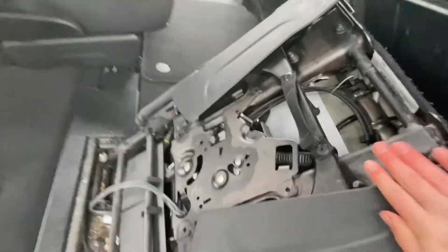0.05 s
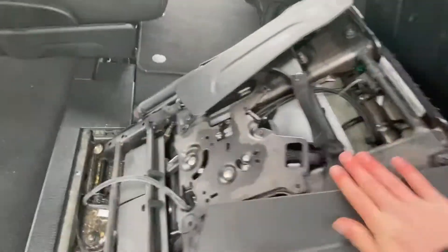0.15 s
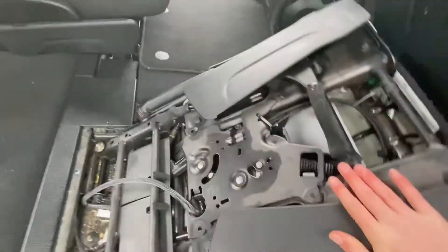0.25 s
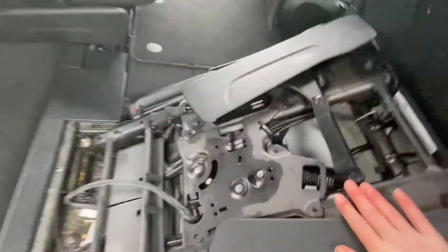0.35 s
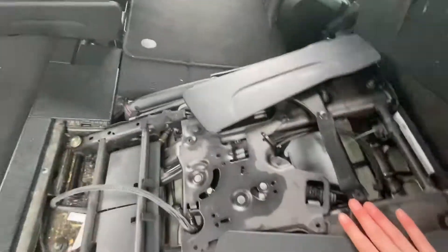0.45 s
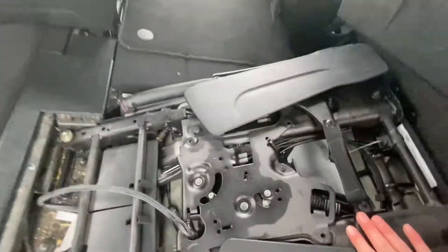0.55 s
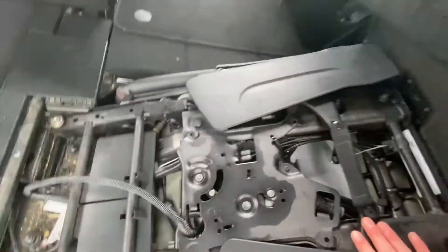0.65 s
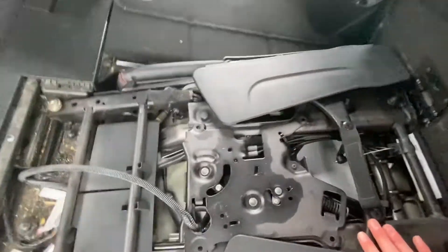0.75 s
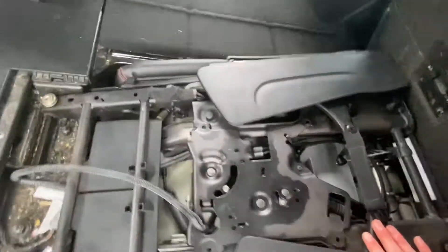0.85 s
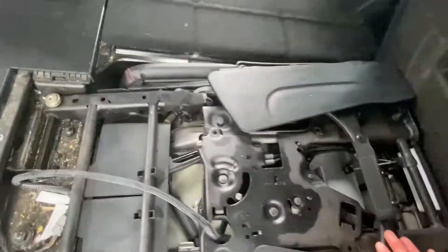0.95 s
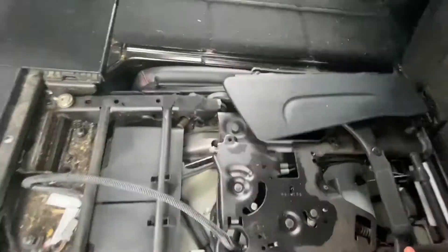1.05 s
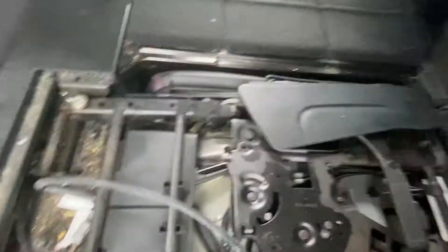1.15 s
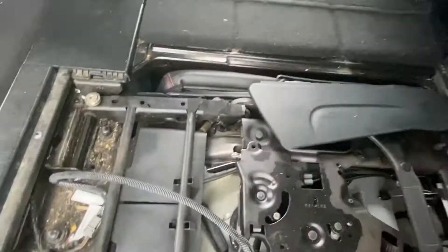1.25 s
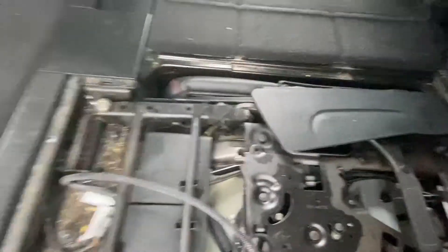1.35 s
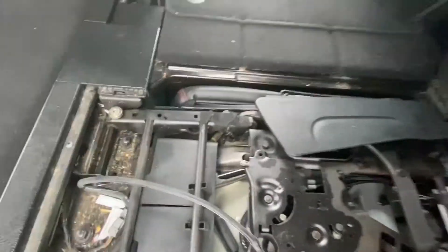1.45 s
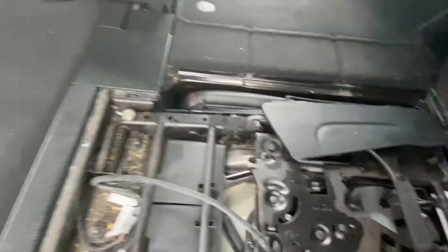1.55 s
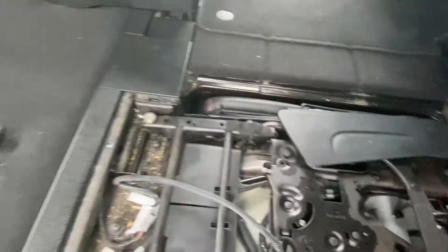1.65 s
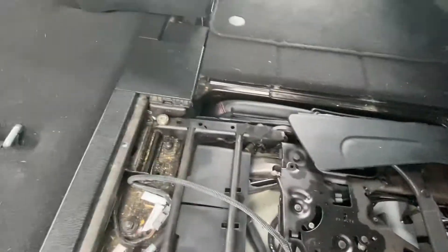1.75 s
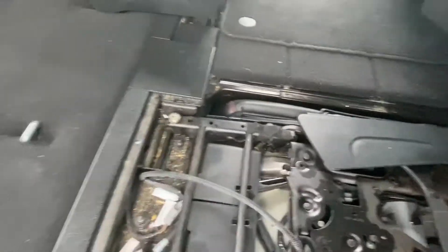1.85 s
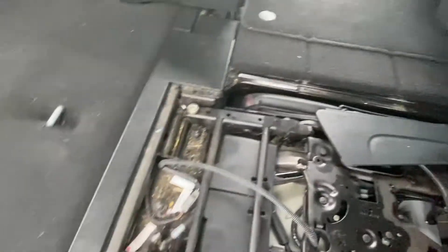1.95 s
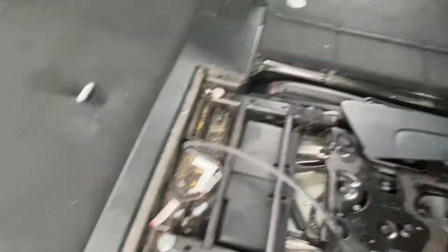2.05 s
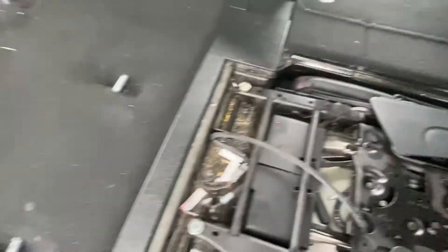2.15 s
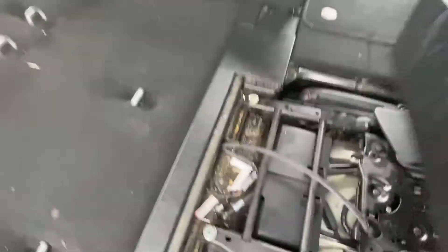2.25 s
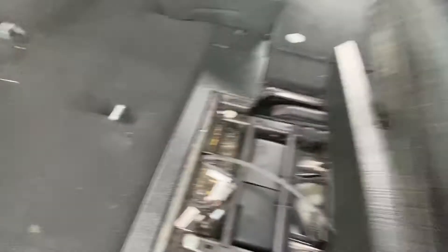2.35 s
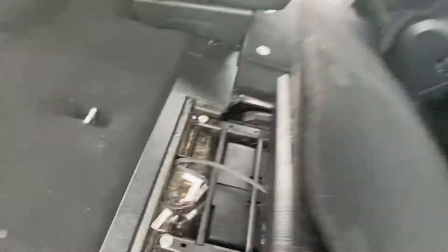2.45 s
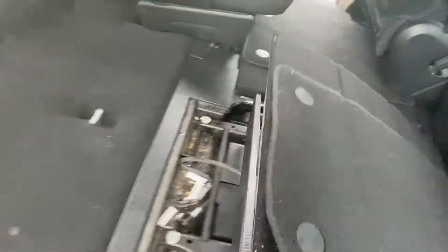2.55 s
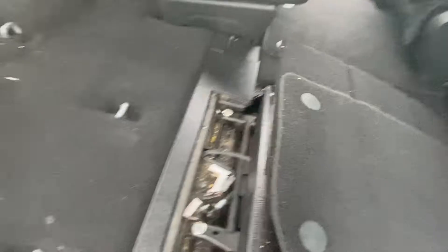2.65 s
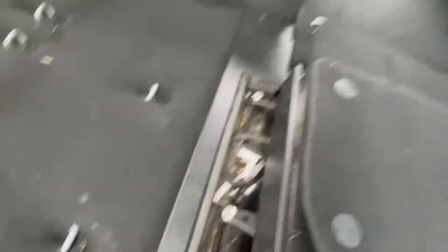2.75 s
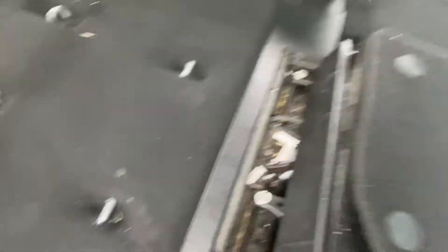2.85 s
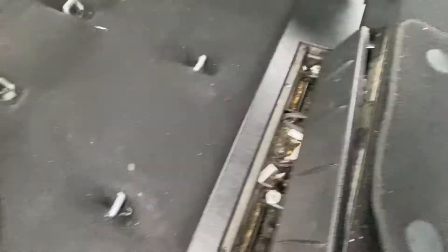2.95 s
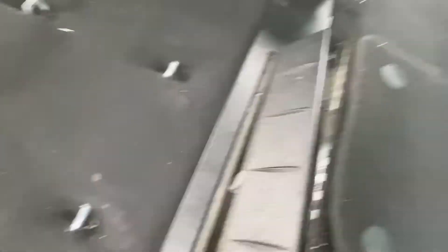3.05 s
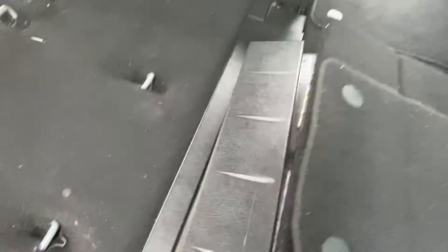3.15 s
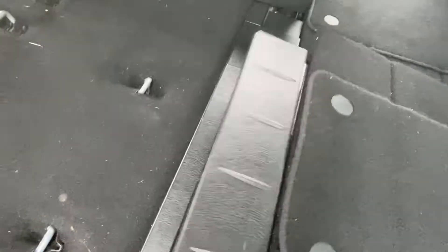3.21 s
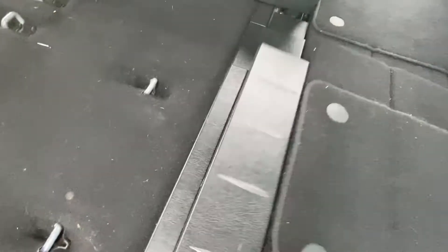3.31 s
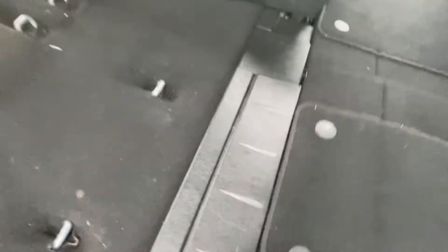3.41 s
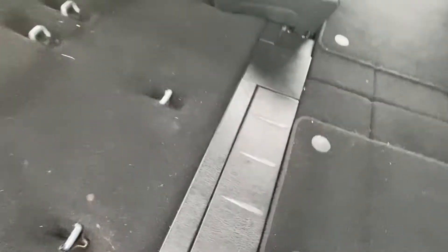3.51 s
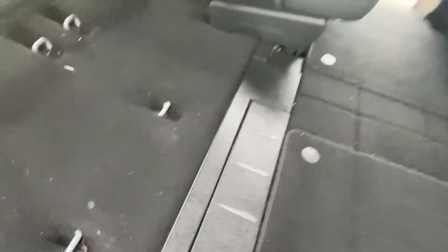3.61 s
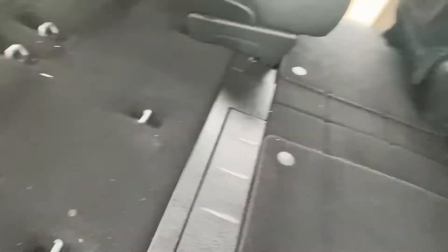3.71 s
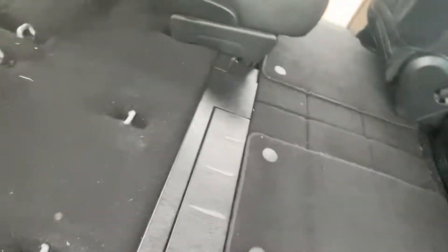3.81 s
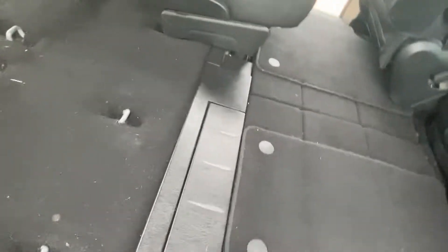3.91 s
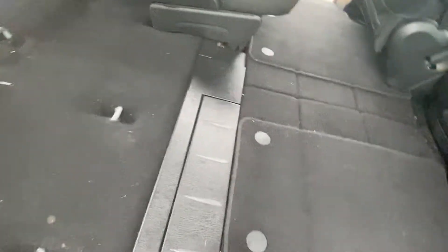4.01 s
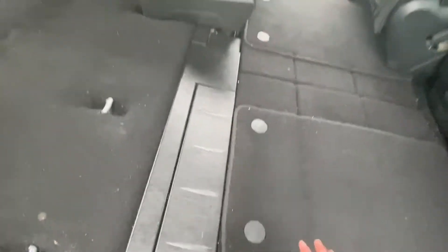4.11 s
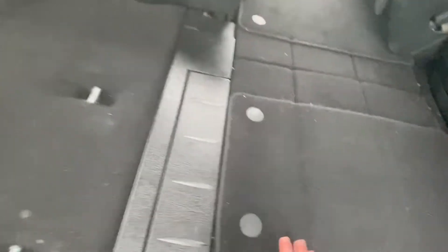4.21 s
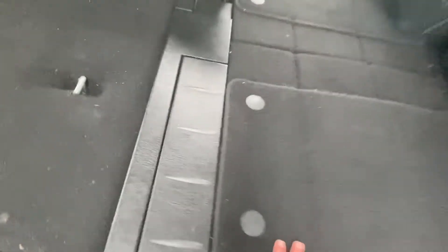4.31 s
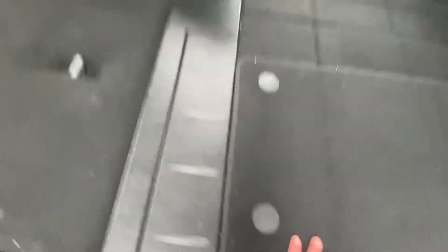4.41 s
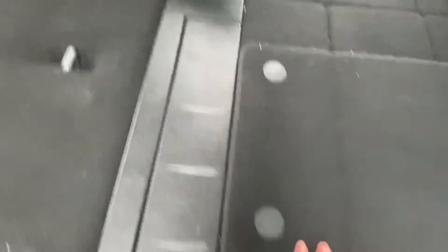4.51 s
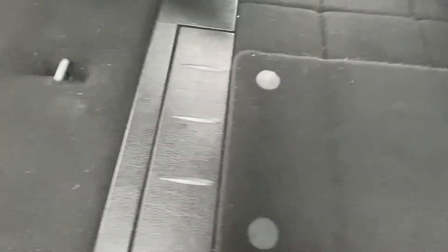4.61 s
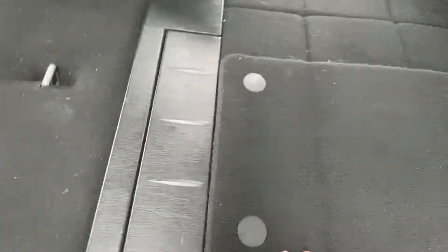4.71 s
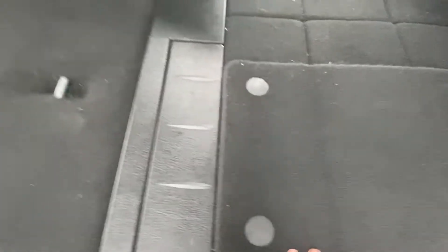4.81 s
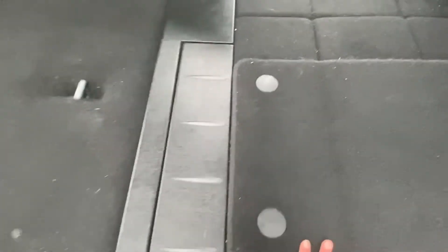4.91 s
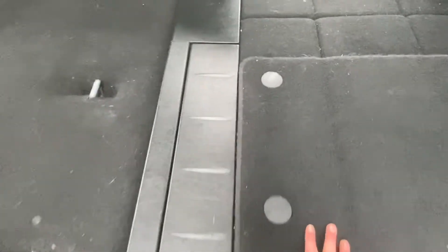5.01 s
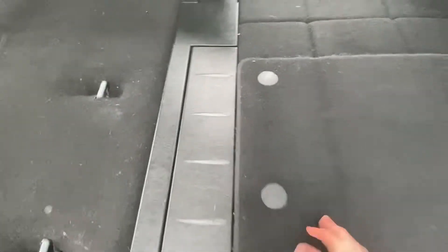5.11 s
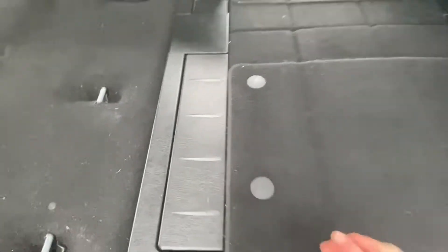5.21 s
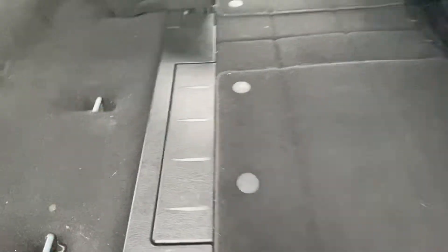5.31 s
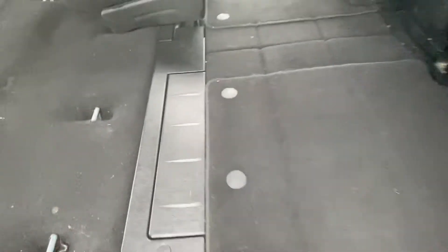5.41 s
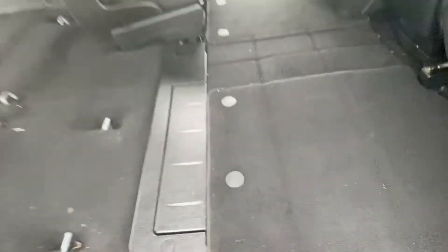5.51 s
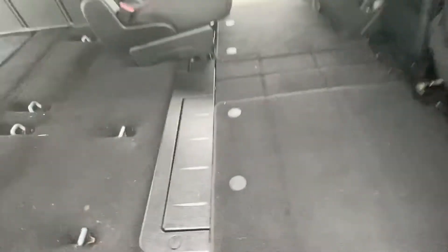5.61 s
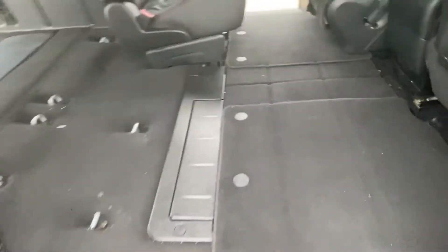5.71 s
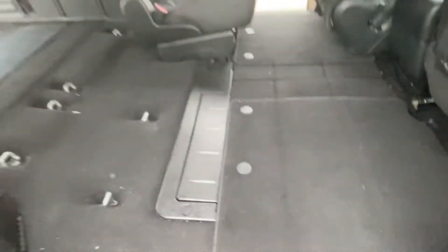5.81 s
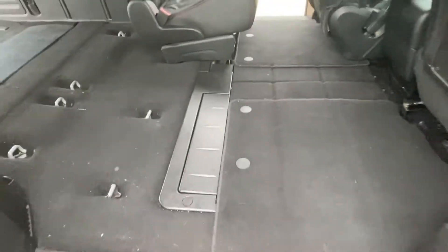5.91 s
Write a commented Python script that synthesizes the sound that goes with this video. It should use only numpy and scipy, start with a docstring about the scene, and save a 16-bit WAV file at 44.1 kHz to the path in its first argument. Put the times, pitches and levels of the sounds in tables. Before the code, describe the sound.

A seat is folded into a vehicle floor by hand. Gritty hinge scraping leads at once to a sharp metallic latch snap, then rubbing fabric and several hard frame knocks. A thumping carpeted panel follows, then quick plastic knocks ending in a loud snap. Soft brushing, small ticks and a muffled pat trail off. The microphone is near, in a small damped cabin with faint hiss and handling rumble.

```python
"""A dry hinge scrapes close by as a vehicle's folding seat goes down into the floor; a steel latch snaps.
The frame knocks as it settles and upholstery rubs; a carpeted panel slaps down, a plastic trim flap clunks
shut and a hand pats the carpet, among scuffs, ticks, faint whistles, rumble and hiss.
Impacts excite dense ringing, a few modes and the floor; friction is a train of tiny random slips
coloured by resonances; the background is filtered noise, and nearby surfaces comb the closer sounds."""
import sys
import numpy as np
from scipy import signal
from scipy.fft import rfft, irfft
from scipy.io import wavfile
from scipy.ndimage import uniform_filter1d

SR = 44100
rng = np.random.default_rng(int(sys.argv[2]) if len(sys.argv) > 2 else 0)


def file_out(sig):
    """Save sig as 16-bit WAV at sys.argv[1]."""
    # one column per channel
    cols = np.atleast_2d(sig).T
    # limit, then scale
    lim = np.clip(cols, -1, 1)
    pcm = np.round(lim * 32767).astype(np.int16)
    wavfile.write(sys.argv[1], SR, pcm)


N = 262836
TIME = np.arange(N) / SR

# Impacts of the steel latch: (time [s], level [dB], low thud [dB re level], 250-1200 Hz boost [dB],
# boost above 4500 Hz [dB], ring t60 [s], chatter [s], left-right [dB], favoured resonance [Hz])
LATCH_IMPACTS = [(.2815, -27, -25, 7.5, 8.5, 0.022, .001, -6.5, 4630),
                 (.3035, -11, -24, -2, 4.5, 0.072, 0.0049, -2.5, 2500),
                 (.3355, -21.5, -4, 7, -2.5, 0.053, 0.0024, -4, 2083),
                 (.352, -33.5, 1, 4.5, 0, .06, .002, -1, 1700),
                 (.3835, -28.5, -20, 13, 15, 0.032, 0.0023, -7, 4960)]
# Impacts of the settling frame: (the same nine columns and units)
FRAME_IMPACTS = [(.8785, -25, 0, 8, 11, 0.058, 0.016, -3.5, 398),
                 (.902, -29.5, -14, 1, -18, 0.023, 0.0039, 0, 515),
                 (1.0745, -16, -2, -7.5, 2, 0.0092, 0.0051, -3, 1030),
                 (1.151, -30.5, 9, 7, -6, 0.097, 0.0085, -4, 756),
                 (1.199, -34.5, 9, 13, -25, 0.16, .002, -16, 1010),
                 (1.2075, -20, -30, -1.5, -2, 0.028, 0.0025, 2.5, 730),
                 (1.218, -27, -1.5, -19, -21, 0.022, 0.0013, -4.5, 2300),
                 (1.3725, -19, -26, 6.5, 6, 0.065, 0.0024, 0, 415),
                 (1.403, -41, -5, 13, -10, 0.044, 0.0034, -14, 800)]
# Impacts of the carpeted panel: (the same nine columns and units)
PANEL_IMPACTS = [(2.5725, -16.5, 4, 0.018, -7, 0.086, 0.023, 0.38, 3440),
                 (2.6645, -29.5, -3.5, 0.01, -16, 0.076, 0.0053, 0, 424),
                 (2.7025, -32, -1, 0, -18, 0.033, 0.011, 0, 1110)]
# Knocks of the plastic flap: (the same nine columns and units)
FLAP_KNOCK_IMPACTS = [(3.0105, -25.5, -5, 0.5, 13.4, 0.05, 0.0022, -2, 650),
                      (3.152, -32.5, 0, 3.5, 0.33, 0.059, 0.0037, -0.5, 353),
                      (3.2255, -26, -2.5, -1, 0.17, 0.014, 0.0045, -2.5, 2630),
                      (3.2945, -15, -20.5, 2.5, 2.2, 0.04, 0.0091, -1.5, 508),
                      (3.332, -23.5, -11, -1.5, 4.2, 0.051, 0.013, -1.5, 1360)]
# Impacts of the flap as it snaps: (the same nine columns and units)
FLAP_SNAP_IMPACTS = [(3.378, -21.5, -15.5, 1.5, 4.5, .05, .006, -1.3, 6940),
                     (3.3825, -9, -16, -3.5, 2.5, 0.033, 0.0085, -1.6, 870),
                     (3.43, -32, -9, 6.5, 0, 0.055, 0.022, -1, 1510),
                     (3.4545, -19.5, -7.5, -4, 3, 0.042, .002, -1.6, 3230),
                     (3.479, -27, -12, 1.5, -3, 0.053, 0.0074, 0, 1250)]
# Pats of a hand on the carpet: (the same nine columns and units)
PAT_IMPACTS = [(4.162, -45.5, -14, 0.0077, 0.0036, .09, 0.0096, 0.24, 232),
               (4.9165, -32, -10, 0, 0, 0.04, 0.0064, -1, 860),
               (5.171, -56, -12, 0.0015, 0.0071, 0.11, .006, 0.18, 297)]
# Small ticks of the trim: (the same nine columns and units)
TICK_IMPACTS = [(.9325, -37.5, 11.5, 6, 6, 0.03, 0.002, -6, 6400),
                (1.533, -38.5, -2, 3.5, -7, 0.13, 0.0091, -2, 2440),
                (1.596, -43.5, -1, 1, 3, 0.046, .002, 0, 2960),
                (1.909, -39.5, -16, -7, -4, 0.022, 0.0031, -2.5, 2950),
                (2.024, -52, -2, 6, -2, 0.025, .001, -7, 2800),
                (2.065, -47, 5, -13, 0, 0.12, 0.0022, -12, 2340),
                (2.973, -52.5, -15, -11, 3, .03, 0.0017, -2, 3320),
                (3.0945, -46, -9.5, -17, -8, 0.082, .002, -0.5, 3130),
                (5.5, -52.5, -13, 8.5, -23, 0.041, 0.00086, 6, 1710),
                (5.848, -48, -10, 8.5, 0, 0.019, 0.0011, -4, 2500),
                (5.902, -49.5, -9, 4, -2.5, 0.024, 0.0013, 0, 2510)]

# Dense, short ringing of the latch: (frequency [Hz], relative level [dB per Hz])
LATCH_SPECTRUM = [(88, -44), (150, -11), (675, -3), (941, -8), (1390, -8), (2060, -3), (3100, -7.5),
                  (3420, -10), (4760, -14), (7770, -27), (14800, -35), (16000, -44.5)]
# Dense ringing of the frame: (frequency [Hz], relative level [dB per Hz])
FRAME_SPECTRUM = [(120, -19), (200, -19), (749, -2), (883, -19), (1080, -4), (1300, -10.5), (2700, -12.5),
                  (2960, -26.5), (4120, -21), (9400, -42.5), (11300, -41), (16000, -44)]
# Dense ringing of the panel: (frequency [Hz], relative level [dB per Hz])
PANEL_SPECTRUM = [(120, -36), (200, -3), (569, -15), (806, -26.5), (1100, -12), (1620, -20.5), (2050, -17),
                  (2960, -20.5), (3490, -20.5), (7830, -21.5), (13100, -29.5), (14600, -20), (16000, -37)]
# Dense ringing of the knocking flap: (frequency [Hz], relative level [dB per Hz])
KNOCK_SPECTRUM = [(110, -37), (180, -6.5), (496, -3.5), (722, -9), (1270, -9), (1390, -13), (1530, -9),
                  (2310, -14.5), (3630, -25), (9820, -43.5), (16000, -51.5)]
# Dense ringing of the snapping flap: (frequency [Hz], relative level [dB per Hz])
SNAP_SPECTRUM = [(110, -43.5), (180, -11), (487, -3), (622, -12), (824, -2.5), (1420, -14), (2690, -9),
                 (3500, -17), (4720, -15.5), (5090, -19.5), (11800, -29), (13300, -32.5), (16000, -31)]
# Dense response of the patted carpet: (frequency [Hz], relative level [dB per Hz])
PAT_SPECTRUM = [(110, -34), (180, 1), (662, -21), (938, -9.5), (1400, -29), (1640, -24), (2140, -41),
                (8000, -48), (10400, -80), (17600, -120)]
# Dense ringing of the ticking trim: (frequency [Hz], relative level [dB per Hz])
TICK_SPECTRUM = [(150, 2.5), (900, 1), (2700, -3), (4500, -7), (9000, -12), (16000, -24.5)]

# Clear modes of latch and trim: (nominal frequency [Hz], relative level [dB], t60 [s])
LATCH_RESONANCES = [(782, 0.5, .12), (953, -1.5, .1), (1324, -20, 0.21), (2060, -16.5, .3), (2040, -23, .1),
                    (2223, -18, .15), (2360, -13, 0.11), (2800, -11.5, .2), (3320, -20, 0.75),
                    (4850, -14, 0.13)]
# Clear modes of the frame: (nominal frequency [Hz], relative level [dB], t60 [s])
FRAME_RESONANCES = [(430.6, -5, 0.13), (761, 5.5, 0.082), (1014, 5.5, 0.052), (1606, -5.5, 0.089),
                    (1946, 0, 0.035), (2320, -9, 0.083), (3160, -14, 0.06)]
# Clear modes of the panel: (nominal frequency [Hz], relative level [dB], t60 [s])
PANEL_RESONANCES = [(616, -37, .12), (1033, -19, 0.22), (2096, 0, 0.063), (2690, -12, 0.17),
                    (3340, -4, 0.056)]
# Clear modes of the flap: (nominal frequency [Hz], relative level [dB], t60 [s])
FLAP_RESONANCES = [(330, -23.5, 0.21), (480, 2, 0.076), (754, -24, 0.057), (937, -12.5, 0.076),
                   (935, -21, 0.12), (1400, -17, 0.08), (2536, -15.5, 0.12)]
# Clear modes of the patted carpet: (nominal frequency [Hz], relative level [dB], t60 [s])
PAT_RESONANCES = [(211, -15, 0.34), (369, -2.5, 0.074), (840, -1, 0.093), (1008, -7, 0.061)]
# Low modes of the floor: (nominal frequency [Hz], relative level [dB], t60 [s])
FLOOR_RESONANCES = [(68, -5.5, 0.09), (102.4, 1, .15), (137.6, 3, 0.2), (186.3, -3, 0.16), (233, -5, 0.068),
                    (317, 3.5, 0.078), (410, -12.5, 0.13)]

# Scraping of the hinge: (time [s], relative song level [dB], relative grit level [dB])
HINGE_LEVELS = [(0.0, -35.5, -39.5), (0.106, -27.5, -34.5), (0.118, -33.5, -37.5), (0.21, -30.5, -33),
                (0.246, -33.5, -32), (0.27, -34, -34)]
# Frame resonances the hinge excites: (frequency [Hz], width [Hz], relative level [dB])
HINGE_RESONANCES = [(663.6, 70, 5.5), (767, 90, -2), (900, 140, -5.5)]
# Grit of the hinge: (frequency [Hz], relative level [dB per Hz])
GRIT_SPECTRUM = [(650, -34), (1100, -9.5), (1740, 1.5), (2180, -1), (4410, -17), (11300, -30.5),
                 (12500, -31.5), (13200, -64.5), (14000, -28.5), (16000, -34)]

# How hard the upholstery drags as the seat sinks: (time [s], level [dB])
DRAG_LEVELS = [(0.0, -42.5), (0.26, -44.5), (0.31, -38.5), (0.4, -34.5), (0.5, -43.5), (0.73, -41.5),
               (0.88, -33.5), (1.03, -46), (1.25, -53), (1.44, -46), (1.65, -56.5), (2.5, -63.5)]
DRAG_REF_DB = -41  # a moderate drag; each band grows from here at its own rate
SETTLE_DB_PER_S = 36  # the drag dies away once the seat lies flat
# Rubbing fabric: (frequency [Hz], relative level [dB per Hz])
FABRIC_SPECTRUM = [(120, -23), (200, -2.5), (305, -11), (380, -7), (647, -12.5), (749, -11), (1160, -16),
                   (5840, -27.5), (6880, -26.5), (11300, -32.5), (12400, -35.5), (13100, -52.5),
                   (14300, -34), (16000, -38.5)]

# Scuffs and scrapes of cloth, carpet and the plastic flap:
# (start [s], length [s], level [dB], rasp [dB re level], hiss [dB re level])
SCUFF_STROKES = [(0.035, 0.19, -41.5, -1.5, -4), (1.334, 0.058, -38, -6, -14.5),
                 (1.634, 0.22, -52, -7.5, -8.5), (1.86, 0.067, -50, -6, -6), (2.063, 0.09, -51, 2, -0.5),
                 (2.144, .22, -63.5, 5, 8.5), (2.276, 0.037, -53.5, 4.5, -14), (2.615, .28, -43.5, 1, -0.5),
                 (3.072, 0.23, -43, -5.5, -12), (3.181, 0.11, -37, -7, -10.5), (3.27, 0.21, -39, 1, -23),
                 (3.519, 0.18, -60, 6, -10), (3.663, 0.19, -48.5, -7.5, -14.5),
                 (3.821, 0.18, -52, -3, -11.5), (4.122, 0.21, -54, -2, -13.5),
                 (4.275, 0.11, -46.5, -4.5, -11), (4.399, 0.24, -58.5, -6.5, -6.5),
                 (4.708, 0.32, -61.5, -6, -4), (4.921, 0.11, -54, -4, -5), (5.04, 0.24, -65.5, -1, -5),
                 (5.548, 0.51, -59, -12, -21), (5.62, .06, -61, -5.5, -8), (5.764, 0.044, -63, -11, -5)]
SCUFF_RISE, SCUFF_FALL = 0.49, 0.74  # shares of a stroke's length
# Spectrum of the scuffs and scrapes: (frequency [Hz], relative level [dB per Hz])
SCUFF_SPECTRUM = [(300, 0.5), (500, 6.5), (800, -2.5), (1300, -4.5), (2100, -1), (3200, -3.5), (4500, -8),
                  (7000, -8.5), (11000, -14.5), (16000, -19.5)]

# Whistles of taut, sliding cloth: (start [s], length [s], level [dB])
WHISTLE_STROKES = [(0.485, 0.18, -49), (1.705, 0.15, -56.5), (4.192, 0.22, -60)]
WHISTLE_HZ, WHISTLE_WIDTH_HZ = 6860, 620

# Soft low swells: jolts of the shell and microphone, and a puff of wind:
# (peak time [s], time from peak to 1/e [s], level [dB])
LOW_SWELLS = [(.06, 0.025, -40), (0.411, .07, -31.5), (1.0, 0.078, -37), (1.2, 0.11, -35),
              (1.41, 0.022, -31.5), (1.75, 0.23, -40), (3.4, 0.084, -37.5), (3.84, 0.16, -41),
              (4.35, 0.035, -29.5), (4.56, 0.1, -40), (5.05, .04, -44), (5.17, 0.088, -53),
              (5.62, .03, -49)]
# Low rumble and swells: (frequency [Hz], relative level [dB per Hz])
RUMBLE_SPECTRUM = [(12, -46), (20, -12), (33, 0.5), (60, 9), (79, 2), (109, -1), (201, -7.5), (275, -7.5),
                   (307, -4.5), (400, -6), (520, -37), (880, -120)]

# Steady hiss of the cabin: (frequency [Hz], relative level [dB per Hz])
AIR_SPECTRUM = [(200, -8), (300, -3.5), (500, -10), (1000, -6.5), (2000, -17.5), (4000, -24.5), (9000, -28),
                (16000, -36.5)]
AIR_DB = -62

# Likeness of the two microphone ports, before limiting to 0-0.98: (frequency [Hz], likeness [-])
PORT_LIKENESS = [(40, -1), (150, 3.9), (500, 0), (1200, 0.77), (3000, 0), (8000, 0), (14000, 1.34)]
# Phase between the ports for sound from the seat: (frequency [Hz], phase [rad])
SEAT_PORT_PHASE = [(240, -1), (450, -1.5), (700, -2.5), (1300, -2), (3000, -2.5), (6000, -4.5)]
# Phase between the ports for sound from the floor: (frequency [Hz], phase [rad])
FLOOR_PORT_PHASE = [(300, -0.44), (550, -0.96), (1000, -1.8), (2500, -0.62), (6000, 0.91), (12000, -1.3)]
# Balance of friction and rumble: (frequency [Hz], left-right [dB])
SOURCE_BALANCE = [(60, -3), (200, -2), (800, -1.5), (2000, 0), (4000, 0)]
# Colour of the ports themselves: (frequency [Hz], left-right [dB])
PORT_BALANCE = [(70, 2), (140, 0), (260, -1), (500, 0), (1000, 0), (2000, 0.5), (3500, 1), (5500, 2),
                (7000, 2), (9000, -5), (12000, -0.5)]
EDGE_HZ = 16200


def blows(rows, colour, modes, phase, modes_db, cabin_db, cabin_t60, rise, thud_delay, clatter):
    """Impact excitation: chattering contact rings parts densely and modally, shakes the floor and echoes."""
    out, size = np.zeros((2, N)), 2 ** 14
    t, hz = np.arange(size) / SR, bins(2 ** 12)
    for s, db, thud_db, middle_db, treble_db, t60, chatter, pan_db, strike_hz in rows:
        contact = amp(-60 * np.maximum(t - chatter, 0) / t60)
        echo = amp(cabin_db - 60 * t / cabin_t60)
        # Hard parts touch in many small impacts
        roughness = unit(uniform_filter1d(rng.standard_normal(size), 40))
        envelope = np.hypot(contact * np.exp(clatter * roughness), echo) * (1 - np.exp(-t / rise))
        burst = ports(*rng.standard_normal((2, size)), phase) * envelope

        boost_db = middle_db * band(hz, 250, 1200) + treble_db * (1 - below(hz, 4500))
        tone = amp(read(colour, hz) + boost_db)
        # The point of contact favours one resonance
        tone *= 1 + 0.91 * resonance(hz, strike_hz, 0.18 * strike_hz)
        dense = signal.fftconvolve(burst, causal(tone)[None], axes=1)[:, :size]
        dense /= np.sqrt(np.mean(dense[:, :SR // 100] ** 2))  # rms 1 over the first 10 ms

        sides = amp(db + np.array([[pan_db], [-pan_db]]) / 2)
        clear = amp(modes_db) * ringing(modes, t, phase, rise, detune=0.0028)
        add(out, s, sides * (dense + clear))
        thud = amp(thud_db) * ringing(FLOOR_RESONANCES, t, phase, rise=0.015, detune=0.015)
        add(out, s + thud_delay, sides * thud)
    return out


def ringing(modes, t, phase, rise, detune):
    """Modal superposition: slightly detuned, exponentially damped sines reach two ports out of phase."""
    out = np.zeros((2, len(t)))
    for hz, db, t60 in modes:
        angle = 2 * np.pi * hz * (1 + detune * rng.standard_normal()) * t
        out += amp(db - 60 * t / t60) * np.sin([angle, angle - read(phase, hz)])
    return out * (1 - np.exp(-t / rise))


def hinge():
    """Stick-slip friction: a dry hinge's slips sing in the frame and spit grit until the latch takes hold."""
    hz = bins(N)
    level_db, grit_db = follow(HINGE_LEVELS)
    slips = grains(per_s=1500, spread_db=3.5, smooth=1.0, phase=SEAT_PORT_PHASE)
    slips = patchy(slips, patch_db=2.5)
    slips = slips * amp(2.2 * wander(55)) * amp([[-2], [2]])  # judder; right louder than left
    frame = sum(amp(db) * resonance(hz, f, width) for f, width, db in HINGE_RESONANCES)
    song = amp(level_db + 5.5) * shaped(slips, frame)
    grit = amp(grit_db + 2.5) * shaped(slips, amp(read(GRIT_SPECTRUM, hz)))
    return (song + grit) * np.interp(TIME, [.262, .285], [1, 0])


def rubbing(body_db=-37.0, rasp_db=-45.5, hiss_db=-51.0, rasp_growth=.75, hiss_growth=.7):
    """Sliding friction of upholstery: rasp and hiss grow with the drag, but less than the body does."""
    slips = grains(per_s=1000, spread_db=1.0, smooth=1.7, phase=SEAT_PORT_PHASE)
    slips = patchy(slips, patch_db=2.5) * amp(0.85 * wander(33))
    body, rasp, hiss = friction_bands(slips, FABRIC_SPECTRUM)
    effort = drag()
    sound = amp(body_db + effort) * body
    sound += amp(rasp_db + rasp_growth * effort) * rasp
    sound += amp(hiss_db + hiss_growth * effort) * hiss
    return sound


def drag():
    """Frictional effort of the seat in dB above a moderate drag, at every sample."""
    settled_s = np.maximum(TIME - DRAG_LEVELS[-1][0], 0)
    return follow(DRAG_LEVELS)[0] - DRAG_REF_DB - SETTLE_DB_PER_S * settled_s


def scuffs():
    """Sliding friction: short, uneven scuffs of cloth, carpet and plastic flap, some dull, some hissing."""
    slips = grains(per_s=990, spread_db=1.0, smooth=1.6, phase=FLOOR_PORT_PHASE)
    slips = patchy(slips, patch_db=4.0) * amp(0.76 * wander(45))
    body, rasp, hiss = friction_bands(slips, SCUFF_SPECTRUM)
    levels = np.zeros((3, N))
    for start, length, db, rasp_db, hiss_db in SCUFF_STROKES:
        levels += amp([[db], [db + rasp_db], [db + hiss_db]]) * stroke(start, length)
    return levels[0] * body + levels[1] * rasp + levels[2] * hiss


def whistles():
    """Resonant friction: the weave of sliding cloth sings in one narrow, high resonance."""
    noise = ports(*rng.standard_normal((2, N)), FLOOR_PORT_PHASE)
    song = shaped(noise, resonance(bins(N), WHISTLE_HZ, WHISTLE_WIDTH_HZ))
    return song * sum(amp(db) * stroke(start, length) for start, length, db in WHISTLE_STROKES)


def stroke(start, length):
    """Envelope of one sliding stroke: it swells and dies away along quarter sines."""
    u = (TIME - start) / length
    return np.sin(np.pi / 2 * np.clip(np.minimum(u / SCUFF_RISE, (1 - u) / SCUFF_FALL), 0, 1))


def grains(per_s, spread_db, smooth, phase):
    """Friction as a random point process: many tiny slips of uneven size over an even hiss."""
    size = amp(spread_db * np.minimum(rng.exponential(1, N), 4)) * (rng.random(N) < per_s / SR)
    a, b = rng.standard_normal((2, N)) * np.hypot(unit(size), smooth)
    return ports(a, b, phase)


def patchy(x, patch_db):
    """Varying contact: as its point wanders, narrow resonances come and go."""
    z = signal.stft(x, nperseg=1024, noverlap=768)[2]
    field = rng.standard_normal(z.shape[1:])
    field = uniform_filter1d(field, 7, axis=0)  # smooth over frequency
    field = unit(uniform_filter1d(field, 16, axis=1))  # smooth over time
    return unit(signal.istft(z * amp(patch_db * field), nperseg=1024, noverlap=768)[1][:, :N])


def friction_bands(slips, colour):
    """Spectral division of friction into body, rasp and hiss, each of rms 1."""
    hz = bins(N)
    tone = leaning(colour, hz)
    edges_hz = [(210, 1300), (1200, 4500), (4700, 22000)]
    return [shaped(slips, tone * band(hz, low, high)) for low, high in edges_hz]


def cabin(x, ripple_db):
    """Interference: hard surfaces nearby comb sound into narrow peaks and dips, differently at each port."""
    hz = bins(2 ** 12)
    shared, *own = unit(uniform_filter1d(rng.standard_normal((3, len(hz))), 4, axis=1))
    ripple = 0.16 * shared + 0.78 * np.array(own)
    gains = amp(ripple_db * ripple * (1 - below(hz, 980)))
    paths = np.array([causal(gain) * gain.max() / np.sqrt(np.mean(gain ** 2)) for gain in gains])
    return signal.oaconvolve(x, paths, axes=1)[:, :N]


def rumble(rest_deep_db=-52, rest_boom_db=-55, drag_deep_db=-48, drag_boom_db=-44, drag_growth=0.71,
           swell_boom_db=-10):
    """Low-frequency noise: the shell rumbles at rest and booms with the drag; soft swells come and go."""
    hz = bins(N)
    lumps = amp(1.5 * wander(14))
    noise = ports(*rng.standard_normal((2, N)), SEAT_PORT_PHASE) * lumps
    colour, shake = leaning(RUMBLE_SPECTRUM, hz), drag_growth * drag()
    swells = sum(amp(db) * np.exp(-((TIME - s) / width) ** 2) for s, width, db in LOW_SWELLS)
    # Unrelated causes add in power
    deep = np.hypot(np.hypot(amp(rest_deep_db), amp(drag_deep_db + shake)), swells)
    boom = np.hypot(np.hypot(amp(rest_boom_db), amp(drag_boom_db + shake)), amp(swell_boom_db) * swells)
    deep_noise = shaped(noise, colour * below(hz, 90))
    boom_noise = shaped(noise, colour * band(hz, 97, 210))
    return deep * deep_noise + boom * boom_noise


def air():
    """Broadband noise: a faint, dull hiss of slowly wandering level fills the cabin."""
    noise = ports(*rng.standard_normal((2, N)), FLOOR_PORT_PHASE) * amp(0.8 * wander(6))
    return amp(AIR_DB) * shaped(noise, amp(read(AIR_SPECTRUM, bins(N))))


def ports(a, b, phase):
    """Partial coherence: two unrelated noises become a partly alike, phase-shifted left and right."""
    hz = bins(len(a))
    same = np.clip(read(PORT_LIKENESS, hz), 0, .98)
    mixed = same * rfft(a) + np.sqrt(1 - same ** 2) * rfft(b)
    right = mixed * np.exp(-1j * read(phase, hz))
    return np.array([a, irfft(right, len(a))])


def leaning(colour, hz):
    """Level difference between ports: a spectrum as gains for left and right."""
    return amp(read(colour, hz) + np.array([[.5], [-.5]]) * read(SOURCE_BALANCE, hz))


def causal(gain, size=2048):
    """Minimum phase: an impulse response of this gain (peak scaled to 1), silent before its start."""
    log_gain = np.log(np.maximum(gain / gain.max(), 1e-5))
    circle = np.concatenate([log_gain, log_gain[-2:0:-1]])
    return np.fft.ifft(np.exp(np.conj(signal.hilbert(circle)))).real[:size]


def resonance(hz, centre_hz, width_hz):
    """Resonance curve: gain 1 at the centre, one half at the edges of its width."""
    return 1 / (1 + (2 * (hz - centre_hz) / width_hz) ** 2)


def below(hz, edge_hz):
    """Low-pass response: a smooth gain that falls above the edge."""
    return 1 / np.sqrt(1 + (hz / edge_hz) ** 8)


def band(hz, lo_hz, hi_hz):
    """Band-pass response: the smooth gain between two edges."""
    return below(hz, hi_hz) * np.sqrt(1 - below(hz, lo_hz) ** 2)


def shaped(x, gain):
    """Linear filtering by a gain per frequency; the result has rms 1."""
    return unit(irfft(rfft(x) * gain, x.shape[-1]))


def wander(hz):
    """Band-limited fluctuation: slow noise of rms 1, up to hz."""
    return shaped(rng.standard_normal(N), below(bins(N), hz))


def amp(db):
    """Logarithmic level: decibels to amplitude gain."""
    return 10 ** (np.asarray(db) / 20)


def unit(x):
    """Effective value: scales to rms 1."""
    return x / np.sqrt(np.mean(x ** 2) + 1e-20)


def read(points, hz):
    """Spectral interpolation: reads a table along a log-frequency axis."""
    f, value = np.transpose(points)
    return np.interp(np.log(hz + 1), np.log(f + 1), value)


def follow(table):
    """Temporal interpolation: the columns of a curve at every sample."""
    s, *columns = np.transpose(table)
    return [np.interp(TIME, s, c) for c in columns]


def add(mix, s, sound):
    """Superposition: mixes a stereo sound in at time s."""
    part = mix[:, max(round(s * SR), 0):][:, :sound.shape[1]]
    part += sound[:, :part.shape[1]]


def bins(size):
    """Discrete spectrum: the frequencies in Hz of a real transform."""
    return np.fft.rfftfreq(size, 1 / SR)


def scene():
    """Superposition of impacts and friction, combed by the cabin, over rumble and air."""
    latch = blows(LATCH_IMPACTS, LATCH_SPECTRUM, LATCH_RESONANCES, SEAT_PORT_PHASE, modes_db=-3.0,
                  cabin_db=-25.0, cabin_t60=0.18, rise=0.0005, thud_delay=0.0051, clatter=0.27)
    ticks = blows(TICK_IMPACTS, TICK_SPECTRUM, LATCH_RESONANCES, FLOOR_PORT_PHASE, modes_db=-13.5,
                  cabin_db=-11.0, cabin_t60=0.18, rise=0.0002, thud_delay=0.003, clatter=0.44)
    frame = blows(FRAME_IMPACTS, FRAME_SPECTRUM, FRAME_RESONANCES, SEAT_PORT_PHASE, modes_db=-1.0,
                  cabin_db=-26.0, cabin_t60=0.25, rise=0.001, thud_delay=0.0032, clatter=0.27)
    panel = blows(PANEL_IMPACTS, PANEL_SPECTRUM, PANEL_RESONANCES, FLOOR_PORT_PHASE, modes_db=-5.5,
                  cabin_db=-15.5, cabin_t60=0.87, rise=0.000088, thud_delay=0.00706, clatter=0.28)
    knocks = blows(FLAP_KNOCK_IMPACTS, KNOCK_SPECTRUM, FLAP_RESONANCES, FLOOR_PORT_PHASE, modes_db=-1.0,
                   cabin_db=-13.5, cabin_t60=0.15, rise=0.0022, thud_delay=0.0017, clatter=0.31)
    snaps = blows(FLAP_SNAP_IMPACTS, SNAP_SPECTRUM, FLAP_RESONANCES, FLOOR_PORT_PHASE, modes_db=-5.5,
                  cabin_db=-15.5, cabin_t60=0.09, rise=0.0023, thud_delay=0.0061, clatter=0.37)
    pats = blows(PAT_IMPACTS, PAT_SPECTRUM, PAT_RESONANCES, FLOOR_PORT_PHASE, modes_db=0.5,
                 cabin_db=-9, cabin_t60=0.13, rise=0.0015, thud_delay=0.0028, clatter=0.16)
    impacts = latch + ticks + frame + panel + knocks + snaps + pats
    friction = hinge() + rubbing() + scuffs() + whistles()
    return cabin(impacts + friction, ripple_db=1.5) + rumble() + air()


def record(dry):
    """Transducer response: the ports colour and notch the sound, peaks round off, then the band is limited."""
    hz = bins(2 ** 12)
    notch_db = -18 * np.exp(-((hz - 13200) / 600) ** 2)
    gains = amp(notch_db + np.array([[.5], [-.5]]) * read(PORT_BALANCE, hz))
    responses = np.array([causal(gain) * gain.max() for gain in gains])
    heard = signal.oaconvolve(dry, responses, axes=1)[:, :N]
    rounded = .92 * heard / (1 + heard ** 6) ** (1 / 6)
    low_pass = signal.firwin(511, EDGE_HZ, window=("kaiser", 9), fs=SR)
    return signal.oaconvolve(rounded, low_pass[None], "same")


dry = scene()
out = record(dry)
file_out(out)
```